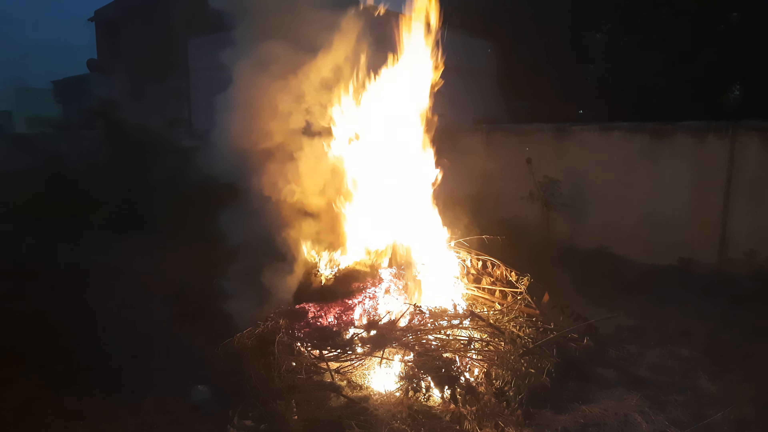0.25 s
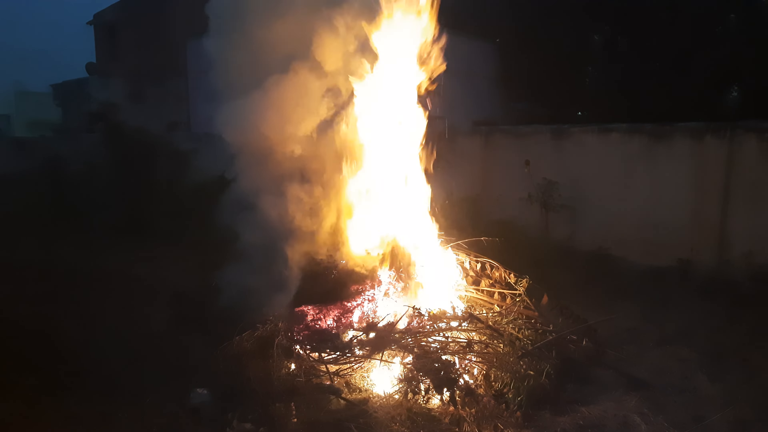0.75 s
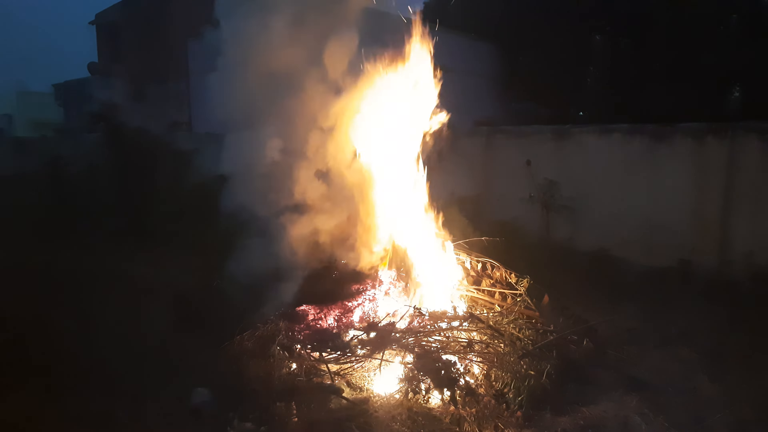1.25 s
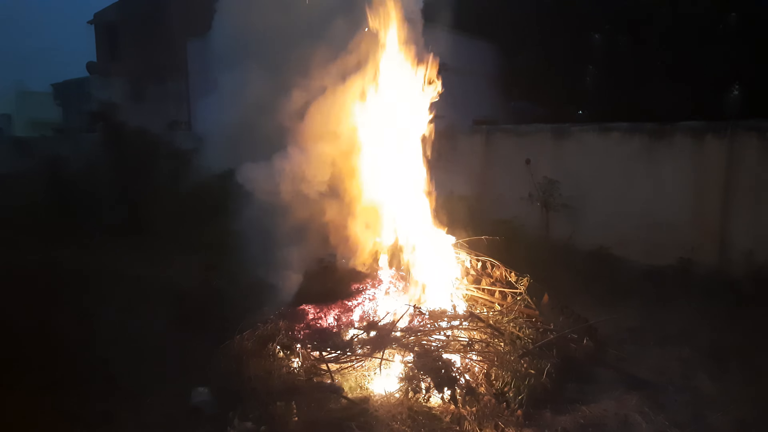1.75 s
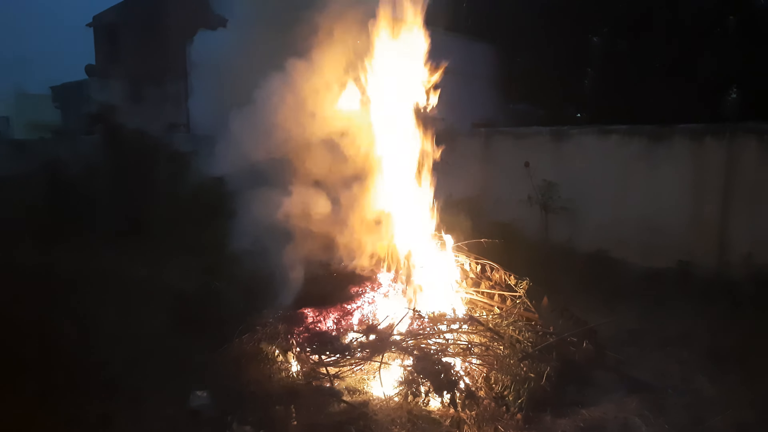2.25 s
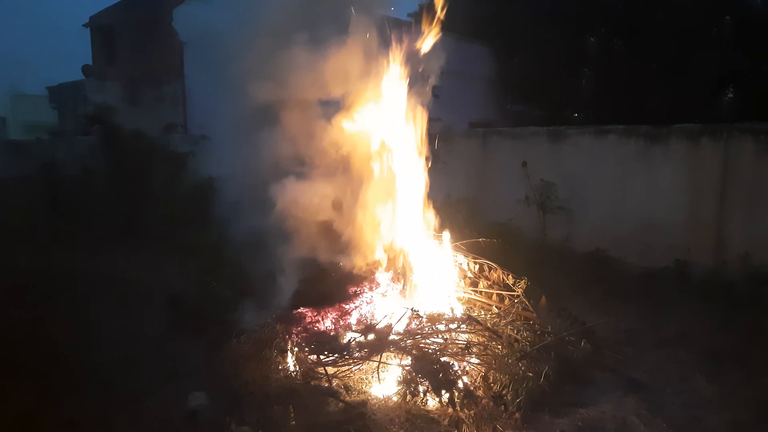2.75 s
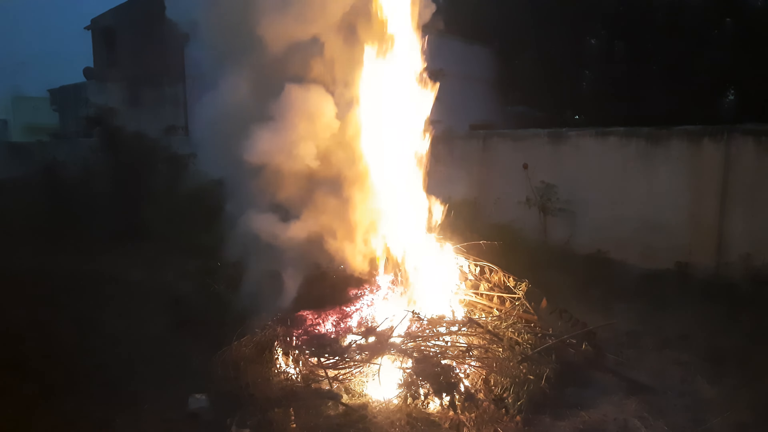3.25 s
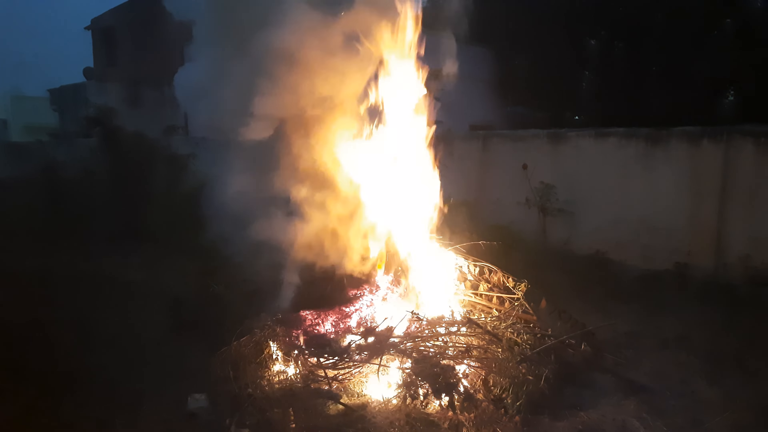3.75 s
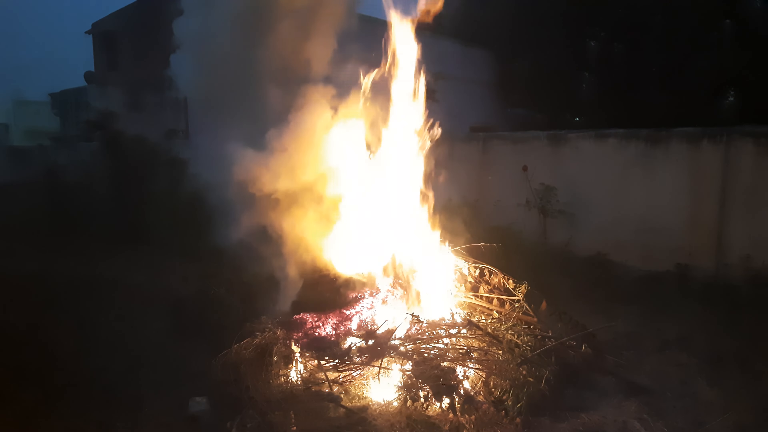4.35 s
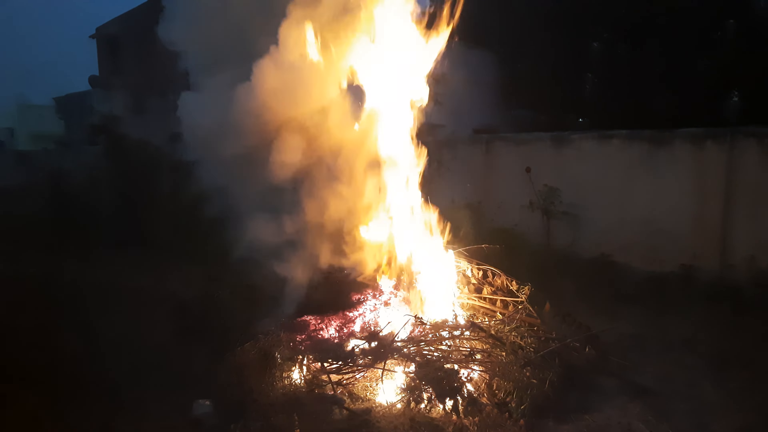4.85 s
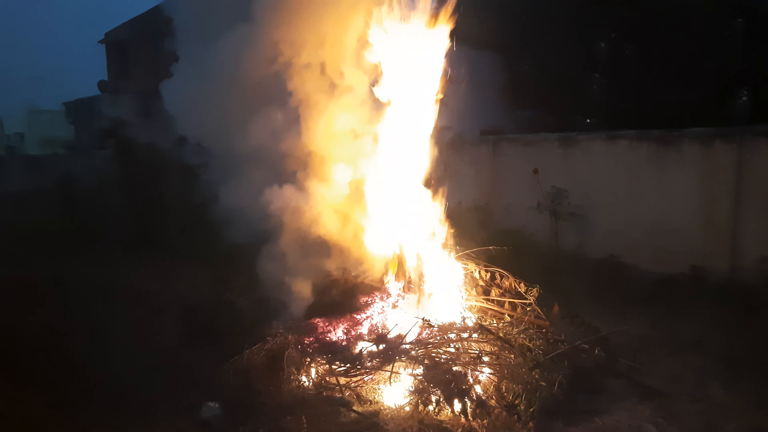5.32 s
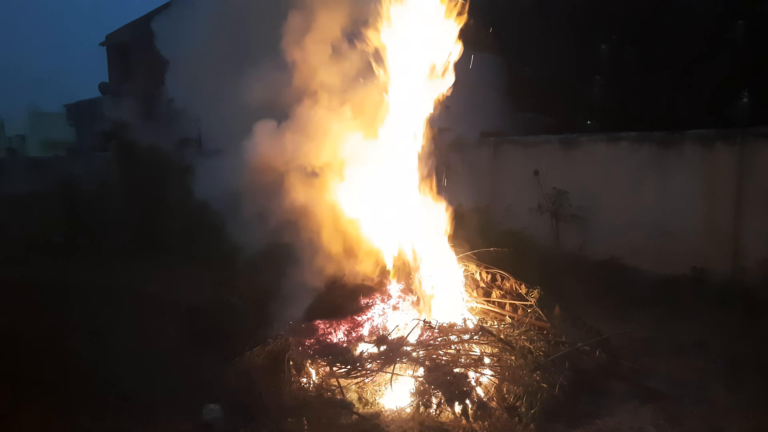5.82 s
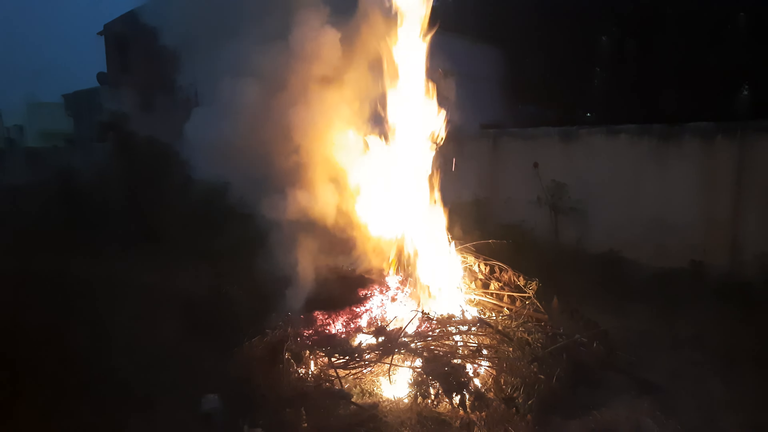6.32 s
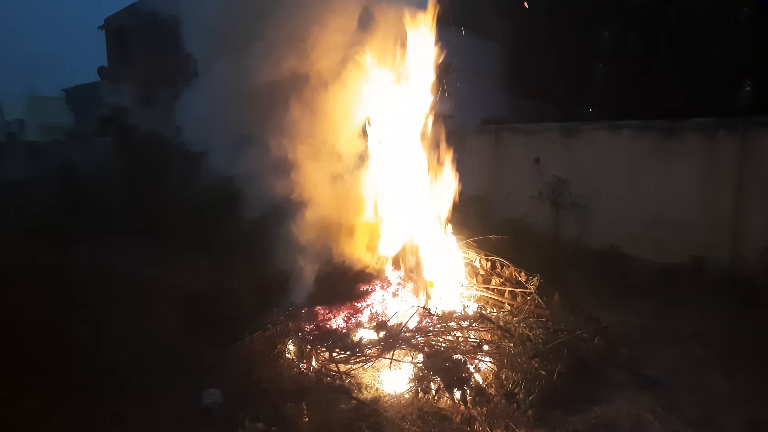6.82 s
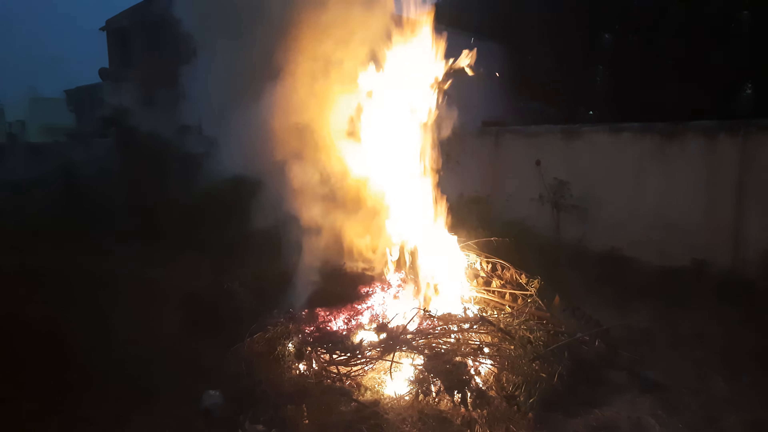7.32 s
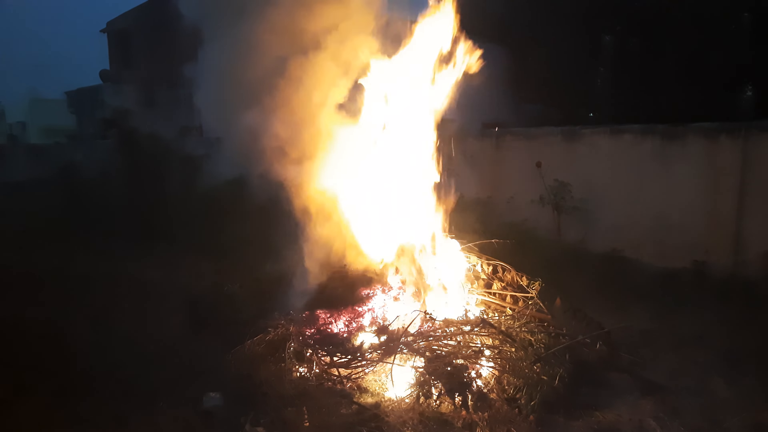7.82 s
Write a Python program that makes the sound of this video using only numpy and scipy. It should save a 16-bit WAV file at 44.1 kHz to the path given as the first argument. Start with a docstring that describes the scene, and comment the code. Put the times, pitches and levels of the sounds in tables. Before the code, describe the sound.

A brush bonfire crackles steadily outdoors, with irregular sharp twig snaps and pops over a faint hiss and low flame roar.

```python
"""A walled yard, a stereo pair of microphones a few metres from a heap of burning dry brush.
The flame flutters with a low roar and hot gas hisses out of the wood. Countless small fibres crackle,
dry tips tick and thicker wood pops. Twigs burst with sharp snaps, each freeing a spurt of gas.
Every crack reaches the microphones directly, then off the ground and the walls."""
import sys
import numpy as np
from scipy import signal
from scipy.fft import rfft, irfft
from scipy.io import wavfile
from scipy.ndimage import uniform_filter1d

SR = 44100
rng = np.random.default_rng(int(sys.argv[2]) if len(sys.argv) > 2 else 0)


def store_pcm(level_fs):
    """Save levels as 16-bit WAV."""
    pcm = np.round(np.clip(level_fs, -1, 1) * 32767).astype(np.int16)
    wavfile.write(sys.argv[1], SR, np.atleast_2d(pcm).T)


N = 355887
BURST_SAMPLES, CUTOFF_HZ = 1024, 16000
SIDES = np.array([[1], [-1]])   # left, right

# The loudest bursting twigs: (time [s], level over 5 ms [dB], tilt [dB/octave], ring pitch [Hz],
# ring [dB], thud [dB], splintering [ms], left minus right [dB])
TWIG_SNAPS = [(0.08, -26.5, 4, 14000.0, 5, 11.0, 0.42, -4), (0.1049, -26, 3.7, 4890.0, 7, 19, 1.1, -3),
              (0.1175, -37.5, 0.3, 2640.0, 6, 15.0, 3.2, 5), (0.129, -34, 3.5, 1430.0, 14, 12, 4.6, -2),
              (0.1835, -19, -2, 6840, 16.5, 2, 0.2, -7), (0.3587, -32.5, 7.1, 6200, 3, 0.0, 0.17, -8),
              (0.373, -33.5, 5.5, 14000.0, -4, 0.0, 0.5, -6), (0.4, -33.5, 4.5, 11750.0, -6, 6, 1.7, -4),
              (0.793, -21.5, 5.5, 6040, -1, 12, 0.9, -4.5), (0.821, -31.5, -2, 7580.0, 13, -10, 0.24, -2),
              (0.8638, -35, 5, 5930.0, 0, 24, 1.5, -1), (0.952, -27.5, -1.5, 5700, 13.5, 8, 0.19, -2),
              (1.039, -25.5, 1.9, 4220, 6.0, -12, 0.8, -2.5),
              (1.0817, -34.5, 5.5, 1310.0, -6, -5.0, 1.8, -3.0), (1.1335, -37, 6, 5820.0, -9, 1.0, 0.9, -5),
              (1.1587, -29, 4, 4890.0, 4, 11, 1.3, -3.5), (1.326, -31.5, 12, 4100.0, 7, 3, 1.5, -2),
              (1.3525, -38.5, 2.5, 1190.0, 6, -3.0, 1.1, -4), (1.3647, -27, -2, 7300, 12.5, 5.5, 0.8, -5),
              (1.3871, -35.9, 1, 3420, 14, 0, 2.9, 0), (1.5025, -19.5, 1.3, 6000, 9.0, 12, 0.83, -8),
              (1.5263, -26.1, -1.4, 3350, 6.0, -13, 3.3, 1.0), (1.7689, -27, 2, 3360, 7, -9, 0.7, -2),
              (1.8221, -29.5, 10, 1310.0, 19, 19.0, 1.2, -5), (1.8403, -18.5, 2.4, 6600, 6, 12.5, 0.19, -2),
              (1.8655, -42, -6, 1200.0, 11, 10, 1.5, 4.0), (1.9795, -24.5, 2.5, 2180, 25, 27, 0.7, 6),
              (2.1106, -36.5, -1.8, 5820.0, 1.0, -14, 1.0, -2),
              (2.1522, -22, 3.5, 6940.0, 3.5, 12.5, 1.6, -4), (2.321, -33.5, 1.8, 4570, 5, 3, 0.4, -2),
              (2.4186, -32.5, 6, 2440, 5, -7.0, 2.4, -3), (2.442, -37.0, 3, 1690, 19, -4.0, 3.7, -1),
              (2.541, -22.5, 1, 4400, 6.5, 7, 1.6, -5), (2.557, -38, 0.9, 4100.0, 5, 6.0, 1.9, -2),
              (2.5694, -19.5, 0.3, 5300, -13, 2.5, 0.6, -3), (2.6485, -16.5, -1, 4830, 4, -3, 1.05, -1),
              (2.7039, -35.7, 2.5, 12820.0, 7, 6.0, 2.4, -3), (2.777, -32, 4.5, 2890.0, 10.0, 22, 1, -3.0),
              (2.8115, -30.5, 0, 5940, 3.5, -1, 0.64, -1.0), (2.863, -31.5, -2.9, 1720, -1, -35, 1.6, 4),
              (2.9029, -30, 0.5, 3060, 17.0, -8.0, 0.7, 1), (2.9234, -36, 7, 8270.0, 6.0, -12, 0.98, -6),
              (2.9844, -29.5, -3, 7900.0, 13, 9, 2.5, -9.0), (2.9897, -17.5, 1, 8900, 14, 5.5, 1.2, -6.5),
              (3.0022, -35.5, -3.5, 6940.0, 2, 16, 2.8, 6), (3.027, -25.5, -6.5, 1220, 7, -9, 1.4, 7.5),
              (3.1298, -36, 5, 6360.0, 4.0, 1.0, 0.67, -4.0), (3.1573, -32.5, 5, 6940.0, 2, -4, 4.8, -4),
              (3.3736, -37.5, 3.5, 1110, 8, 0.0, 1, -2), (3.4878, -40, 4, 5820.0, 6, -6, 1.6, -7.0),
              (3.6257, -37.5, -3.5, 12490.0, 7, 6, 3.8, 3), (3.6692, -31.5, 2.0, 6860, 4.0, 7, 2.3, -3),
              (3.6883, -32, 0.8, 12820.0, 12, 8, 0.3, -5.0),
              (3.7962, -40.5, -0.5, 1780.0, 4.0, -8, 1.1, -1), (4.0415, -36, 0, 4890.0, 20, 23, 0.46, -1),
              (4.0913, -36.5, -2, 1740, 8.0, -1, 0.78, 5), (4.1089, -33.5, 3.5, 14000.0, 1.0, 3, 0.9, -6),
              (4.1477, -33, 1.5, 2420.0, 5, 15.5, 1.1, -2.0), (4.1717, -36, -2.5, 2140, 17, 13, 2.6, 4),
              (4.2887, -35, -1, 2120.0, 1.0, -1, 2.5, 3.0), (4.301, -29.5, 4.5, 5820.0, -20, 20, 0.8, -6.0),
              (4.3152, -36, 0.5, 1590, 9, -5, 2.8, 0), (4.3544, -28.5, 1.7, 2220.0, 10, 16, 1.3, 0),
              (4.3783, -32, -2, 2470, 23, -1.0, 2.3, 3), (4.4146, -37.5, 0.5, 13220.0, 9.0, -9, 1.2, -4.0),
              (4.4498, -34.5, -4.5, 4480.0, 7, 2, 3, 2), (4.4806, -31.5, -6.5, 5270, 17, -4, 1.2, 1),
              (4.5037, -26.5, -3.5, 7500, 18, -19, 1.3, -2), (4.5285, -32, -2.6, 7000, 16.0, -8, 1.3, -3),
              (4.555, -16.5, 0.3, 7450, 4.5, 0.5, 1.2, -6), (4.582, -31.5, 2, 4480.0, 10, -11.0, 3.1, 4),
              (4.6203, -20.5, -3, 2660, 1.5, -6.5, 1.1, 1.0), (4.6483, -41, -7, 1430.0, 10, 9, 2.7, 7),
              (4.7464, -30, 1.5, 5820.0, 5, 12.0, 1.2, -6.0), (4.7833, -17, 4.5, 5330.0, -5, 19.5, 1.4, -8),
              (4.8552, -24, 4, 2200, 3.5, 7, 0.5, -4), (5.0269, -23, 1.9, 6840, 0, 5, 0.6, -3.0),
              (5.2799, -27.5, 0.2, 2890.0, 5.0, 14, 0.73, -2.0), (5.2941, -29, 0.5, 4400, 4, 9, 1.3, -3),
              (5.3188, -34.8, 0, 3440.0, 4.0, -17.0, 3.5, 5.5),
              (5.332, -22.7, 2.4, 5430, -10, 6, 0.67, -8.5), (5.5039, -34, 7.1, 10760.0, 10, 0.0, 0.4, -11),
              (5.5274, -31, 5, 6800, 19, 20, 1.3, -4), (5.6475, -25.5, -1, 3200, 7, 6, 1.3, -4.5),
              (5.922, -21.5, 0.1, 5330.0, 6, 3.5, 0.77, -5.5), (5.946, -31, 0.5, 1550, 4, -1, 2.8, -1.0),
              (5.961, -38, 4, 1430.0, 4.0, 8, 1.5, -1), (6.0818, -23, 1.9, 10400, 20.0, 14, 0.28, -5.5),
              (6.1647, -32.3, -1.3, 4670, 4.5, 11, 1.1, -8.5), (6.3277, -31, -0.4, 2620, 13, 1, 0.88, -1),
              (6.3823, -15.5, -1.4, 8900, 12, 4, 2.5, -6.0), (6.4108, -35, -1, 1690, 4.0, -8.0, 2.3, 3),
              (6.4344, -33.4, 4, 8270.0, -3, -8.0, 2.1, -2.0),
              (6.4991, -36.5, -1, 1500.0, 12, 18.5, 2.3, 2), (6.5792, -32.5, -1, 10200, 10, -8.0, 2, -4),
              (6.7868, -26, -1.5, 1630, 5, -1, 1.4, -2), (6.8473, -34.5, -0.5, 6940.0, 24, -2.0, 1.2, -4.0),
              (6.9246, -36, -1.5, 3380, 5.0, -18, 1.1, 1), (6.9866, -35.5, 7, 1710.0, 12, 0.0, 0.4, -6),
              (7.0498, -31, -1.5, 2640.0, 13, -3, 0.71, 3.5), (7.1677, -35.5, 2.8, 5820.0, 7, 19, 0.52, -3),
              (7.2365, -30.5, -2.7, 3370, 14, 9.5, 1.5, 2), (7.2779, -33.7, 2, 2430, 6, -9.0, 0.58, -2),
              (7.3758, -23.5, -1, 7500, 11.0, 1.0, 1.7, -4.5), (7.4, -28, 0, 1560.0, 2, -16, 2, 1),
              (7.4516, -24, -4, 1630, 7.5, -2.5, 1.35, 6), (7.4946, -24.0, 1, 7040, 7.5, 2, 0.71, -5.0),
              (7.5194, -34.5, 2, 7460, 20, -1.0, 1.8, -1.0), (7.5441, -33, -2.7, 5330.0, 2.0, 4.0, 1.9, 1),
              (7.583, -20.5, 0.4, 8600, 7.5, 3, 0.83, -8.5), (7.608, -35, 3, 1420, 2, -4.0, 2.1, 2),
              (7.62, -41, 3.5, 4480.0, 9, 14, 0.7, -3.0), (7.6505, -29.5, 3.5, 5250, 7, -1, 0.33, -8),
              (7.6747, -31.5, 2.3, 9030.0, 6, 19, 1.4, -6), (7.6895, -31.5, 1.5, 7580.0, 0, -12, 0.36, -1),
              (7.7134, -31.5, 0, 7580.0, -9, 4, 5, 1), (7.7487, -35.5, 0.5, 3100, 5, 15, 0.78, -1),
              (7.896, -36, 9, 14200, 2, 15, 5.2, -3), (8.0553, -28.5, -2.2, 4200, 10, 1, 0.32, -5)]


def from_db(db):
    """Decibels as an amplitude ratio."""
    return 10 ** (np.asarray(db) / 20)


def unit_rms(x):
    """The signal scaled to an rms of 1."""
    return x / np.sqrt(np.mean(x ** 2) + 1e-20)


def bin_hz(size=N):
    """Frequencies of the bins of a transform."""
    return np.arange(size // 2 + 1) * SR / size


def in_time(curve):
    """A (time, value) curve at every sample."""
    return np.interp(np.arange(N) / SR, *np.transpose(curve))


def at_hz(points, hz):
    """Each column of a spectrum, joined on a log-frequency axis."""
    known_hz, *columns = np.transpose(points)
    return np.array([np.interp(np.log(hz + 1), np.log(known_hz), column) for column in columns])


def drift(rate_hz):
    """A random wander of rms 1, with `rate_hz` new values a second."""
    knots = rng.standard_normal(4096)
    return unit_rms(np.interp(np.arange(N) / SR * rate_hz, np.arange(len(knots)), knots))


def stereo_noise(spectrum, alike):
    """Coloured noise of rms 1, partly shared by the two microphones."""
    mid, side = rng.standard_normal((2, N))
    white = np.sqrt(1 + alike) * mid + np.sqrt(1 - alike) * side * SIDES
    return unit_rms(irfft(rfft(white) * from_db(at_hz(spectrum, bin_hz())), N))


def minimum_phase(gain):
    """A response with this gain in which nothing sounds before the crack."""
    cepstrum = irfft(np.log(gain + 1e-6))
    cepstrum[..., 1:BURST_SAMPLES // 2] *= 2
    cepstrum[..., BURST_SAMPLES // 2 + 1:] = 0
    return np.exp(rfft(cepstrum))


def flame(gain_db=2.5, flutter_db=2.5):
    """The column of flame makes a low, fluttering roar, nearly the same at both microphones."""
    # Spectrum of the turbulence: (frequency [Hz], relative level [dB])
    roar_spectrum = [(20, -36), (30, -30), (38, -13), (52, -0.5), (64, -6), (80, 2.5), (98, -4), (120, 3),
                     (180, -5), (270, -3.5), (400, -11.5), (560, -27), (1000, -24), (6000, -65)]
    # Rise and fall of the blaze: (time [s], level before gain [dB])
    blaze = [(0.0, -56), (0.76, -59), (0.99, -55), (1.3, -59), (1.75, -56.5), (2.88, -59.5), (4.09, -60),
             (4.49, -55.5), (5.15, -60), (5.53, -55), (5.77, -59.5), (6.56, -56), (6.99, -59),
             (7.57, -54.5), (7.84, -56.5), (8.07, -57.5)]
    turbulence = stereo_noise(roar_spectrum, alike=0.84)
    return turbulence * from_db(in_time(blaze) + gain_db + flutter_db * drift(rate_hz=25))


def fizz_level(gain_db=-6.5, waver_db=1.38):
    """Level of the fizz in dB: it follows the fire's vigour and wavers as flame licks over the brush."""
    # How hard the brush burns: (time [s], level before gain [dB])
    vigour = [(0.0, -50.4), (0.12, -49), (0.96, -54), (1.08, -44), (1.32, -54.5), (1.44, -53), (2.28, -49),
              (2.88, -49), (3.36, -52), (3.72, -50), (3.84, -58.5), (4.08, -49), (4.8, -54), (4.92, -59),
              (5.16, -46.5), (5.28, -58.5), (5.64, -45.5), (6.0, -54.5), (6.12, -45), (6.24, -51.5),
              (6.48, -49.5), (6.72, -49), (7.44, -52), (7.68, -47), (7.8, -55), (8.07, -47)]
    return in_time(vigour) + gain_db + waver_db * drift(rate_hz=12)


def gas_flow(fizz_db, spurt_db=-26.5, rise_s=0.0061, fall_s=0.059):
    """Flow of gas in dB: the fizz plus a dying spurt freed by each twig snap."""
    power = from_db(fizz_db) ** 2
    t = np.arange(SR // 2) / SR
    spurt = (1 - np.exp(-t / rise_s)) * np.exp(-t / fall_s)
    for time_s, snap_db, *_ in TWIG_SNAPS:
        start = int(time_s * SR)
        power[start:start + len(t)] += (from_db(snap_db + spurt_db) * spurt[:N - start]) ** 2
    return 10 * np.log10(power)


def hiss(flow_db, gain_db=-1.0, flicker_db=2.5):
    """Gas jets out of the heated wood with a flickering hiss."""
    # Spectrum of the escaping gas: (frequency [Hz], relative level [dB])
    jet_spectrum = [(250, -20), (560, -9.5), (850, 2), (1350, -10), (1750, -1), (2150, 0), (2700, -4.5),
                    (3400, -5), (4700, 1.5), (6100, -3.5), (7600, 0.5), (9700, -15.5), (12300, -3),
                    (15500, -13)]
    # Its balance between the microphones: (frequency [Hz], left minus right [dB])
    balance = [(600, 6.5), (1300, -2), (2300, 2), (4400, 4.5), (8000, -3), (15000, -10)]
    jets = stereo_noise(jet_spectrum, alike=0.55)
    panned = irfft(rfft(jets) * from_db(at_hz(balance, bin_hz()) * SIDES / 2), N)
    return panned * from_db(flow_db + gain_db + flicker_db * drift(rate_hz=60))


def bursts(rows, splinter_db=7.0, splinter_hz=900, alike=0.45, ring_q=3.17, thud_hz=520, shade_hz=800,
           ground_s=0.0008895, ground_share=0.82, ground_dull_hz=6840, left_lead_s=0.00003):
    """Wood bursts with one pressure pulse and a spray of splinters; columns as in TWIG_SNAPS."""
    # Colour of a crack at the two microphones: (frequency [Hz], left [dB], right [dB])
    mic_colour = [(99, -19.5, -18.5), (253, -9, -8), (470, -9.5, -8.5), (880, -10, -3), (1410, -3.5, -16),
                  (2200, -1.5, -11), (3080, -16, -2), (3180, -21.5, -8.5), (4800, -5, 1), (6170, -12.5, -2),
                  (7880, -5, 0), (9800, -19, -14), (12230, -13.5, -4.5), (15500, -17.5, -11.5)]
    time_s, level_db, tilt, ring_hz, ring_db, thud_db, splinter_ms, pan_db = rows.T[:, :, None, None]
    hz, ms = bin_hz(BURST_SAMPLES), np.arange(BURST_SAMPLES) / SR * 1000
    chance = rng.standard_normal((len(rows), 4, BURST_SAMPLES))

    # splinters die away within milliseconds and reach each microphone a little differently
    splinter_ms = np.maximum(splinter_ms, 0.2)
    spray = np.sqrt(alike) * chance[:, :1] + np.sqrt(1 - alike) * chance[:, 1:3]
    spray *= np.exp(-ms / splinter_ms)
    spray /= np.sqrt(np.sum(spray ** 2, axis=-1, keepdims=True))
    spray *= from_db(splinter_db) * splinter_ms   # long splintering outweighs the first pulse
    crack = 1 + rfft(spray) * (1j * hz / (splinter_hz + 1j * hz)) ** 2
    whitening = uniform_filter1d(np.abs(crack) ** 2, size=25, axis=-1) ** -0.5

    # the colour comes from the twig: thick wood pops, thin wood ticks, each rings at its own pitch
    octaves = np.log2(np.maximum(hz, 500) / 4000)
    detuning = ring_q * (hz / ring_hz - ring_hz / (hz + 1))
    ring = np.sqrt(1 + from_db(ring_db) ** 2 / (1 + detuning ** 2))
    bass_db = thud_db / (1 + (hz / thud_hz) ** 6)   # each crack has more or less low thud
    colour = from_db(tilt * octaves + bass_db + at_hz(mic_colour, hz))
    band_ends = (hz + 5) / (hz + 60) / np.sqrt(1 + (hz / CUTOFF_HZ) ** 20)

    # height in the heap sets the delay of the ground bounce, bearing the lag between the microphones
    height, bearing = chance[:, 3:, :1], chance[:, 3:, 1:2]
    bounce = np.exp(-2j * np.pi * hz * ground_s * np.exp(0.1 * height))
    ground = 1 + ground_share * np.exp(-hz / ground_dull_hz) * bounce
    arrival = np.exp(1j * np.pi * hz * SIDES * left_lead_s * (1 + 0.79 * bearing))
    spectra = crack * ground * minimum_phase(whitening * ring * band_ends * colour)

    # the microphone housing shades one side, but only in the treble
    side_db = 10 * np.log10(np.sum(np.abs(spectra) ** 2, axis=-1, keepdims=True))
    shade_db = (pan_db - side_db[:, :1] + side_db[:, 1:]) * hz ** 2 / (hz ** 2 + shade_hz ** 2)
    waves = irfft(spectra * arrival * from_db(shade_db * SIDES / 2))
    waves = np.roll(waves, 8, axis=-1)   # room for the side that arrives first
    rms_over_5ms = np.sqrt(np.sum(waves ** 2, axis=(1, 2), keepdims=True) / (2 * 0.005 * SR))
    waves *= from_db(level_db) / rms_over_5ms

    track = np.zeros((2, N + BURST_SAMPLES))
    starts = np.clip(time_s.ravel() * SR, 0, N - 1).astype(int)
    for start, wave in zip(starts, waves):
        track[:, start:start + BURST_SAMPLES] += wave
    return track[:, :N]


def crackle(fizz_db, per_s, above_db, spread_db, largest_db, mean_tilt, tilt_spread,
            low_hz, high_hz, ring_db, thud_db, splinter_ms, count):
    """Small bursts come at random, most of them faint, louder where the brush fizzes hardest."""
    even, normal = rng.random((count, 3)), rng.standard_normal((count, 3))
    time_s = np.cumsum(-np.log(1 - even[:, 0])) / per_s
    floor_db = np.interp(time_s * SR, np.arange(N), fizz_db) + above_db
    level_db = np.minimum(floor_db - spread_db * np.log(1 - even[:, 1]), largest_db)
    tilt = mean_tilt + tilt_spread * normal[:, 0]
    ring_hz = low_hz * (high_hz / low_hz) ** np.sqrt(even[:, 2])
    decay_ms = splinter_ms * np.exp(1.25 * normal[:, 1])
    pan_db = -1.5 - 1.3 * tilt + normal[:, 2]   # the left microphone favours pops, the right one ticks
    rows = np.column_stack([time_s, level_db, tilt, ring_hz, np.full(count, ring_db),
                            np.full(count, thud_db), decay_ms, pan_db])
    return bursts(rows[time_s < N / SR])


def fibres(fizz_db):
    """Countless thin fibres burst in a fine, bright crackle."""
    return crackle(fizz_db, per_s=140, above_db=0.5, spread_db=4.0, largest_db=-39.5,
                   mean_tilt=1.8, tilt_spread=3.7, low_hz=1630, high_hz=14700,
                   ring_db=14.0, thud_db=-4.5, splinter_ms=1.0, count=1600)


def needles(fizz_db, follows=0.48):
    """The finest dry tips burst with thin, glassy ticks that carry on through the lulls."""
    evened_db = fizz_db.mean() + follows * (fizz_db - fizz_db.mean())
    return crackle(evened_db, per_s=30, above_db=7.5, spread_db=2.0, largest_db=-31,
                   mean_tilt=4.5, tilt_spread=1.6, low_hz=7700, high_hz=14500,
                   ring_db=7.5, thud_db=3.0, splinter_ms=1.0, count=400)


def snaps(spread_db=4.0):
    """Twigs burst sharply; a very faint tick leads into each snap, and a light crack follows."""
    # The tick before and the crack after: (typical offset [s], level relative to the snap [dB])
    side_cracks = [(-.004, -27), (.008, -18.5)]
    twigs = np.array(TWIG_SNAPS)
    chance = rng.standard_normal((len(twigs), len(side_cracks), 2))
    cracks = [twigs]
    for k, (offset_s, relative_db) in enumerate(side_cracks):
        time_s = twigs[:, 0] + offset_s * np.exp(chance[:, k, 0] / 2)
        level_db = twigs[:, 1] + relative_db + spread_db * chance[:, k, 1]
        cracks.append(np.column_stack([time_s, level_db, twigs[:, 2:]]))
    return bursts(np.vstack(cracks))


def embers(fizz_db):
    """Thicker wood deep in the heap gives small, dull pops."""
    return crackle(fizz_db, per_s=12, above_db=5.0, spread_db=4.0, largest_db=-40,
                   mean_tilt=-1.6, tilt_spread=0.83, low_hz=1200, high_hz=2370,
                   ring_db=7.5, thud_db=7.5, splinter_ms=1.2, count=160)


def yard_echoes(wood, tail_db=-15.5, t60_s=0.36, build_s=0.00022, scatter_s=0.002,
                band_hz=(500, 9000), spots=3):
    """Rough walls return a few smeared echoes and a faint diffuse tail."""
    # Echoes off the walls: (delay [s], level before the band filter [dB])
    walls = [(.0098, -25.5), (0.0174, -28), (0.024, -17.5)]
    t = np.arange(SR) / SR
    power = from_db(-120 * t / t60_s) * (1 - np.exp(-t / build_s)) ** 2
    power *= from_db(tail_db) ** 2 / power.sum()
    for delay_s, echo_db in walls:
        echo = (t >= delay_s) * np.exp(-np.abs(t - delay_s) / scatter_s)
        power += from_db(echo_db) ** 2 * echo / echo.sum()
    band = signal.butter(1, band_hz, "band", fs=SR, output="sos")
    responses = signal.sosfilt(band, np.sqrt(power) * rng.standard_normal((spots, 2, SR)))
    # the bursts wander over the heap, and every spot has its own pattern of reflections
    spot = rng.integers(0, spots, N // BURST_SAMPLES + 1)[np.arange(N) // BURST_SAMPLES]
    return sum(signal.fftconvolve(wood * (spot == k), response, axes=1)[:, :N]
               for k, response in enumerate(responses))


def scene():
    """The fire from a few metres: snaps and crackle with their echoes, over hiss and flame."""
    fizz_db = fizz_level()
    wood = snaps() + fibres(fizz_db) + needles(fizz_db) + embers(fizz_db)
    return wood + yard_echoes(wood) + hiss(gas_flow(fizz_db)) + flame()


def record(dry, ceiling=3.0):
    """The tallest peaks are rounded and the top octave ends steeply."""
    rounded = ceiling * np.tanh(dry / ceiling)
    lowpass = signal.ellip(10, 0.1, 70, CUTOFF_HZ, fs=SR, output="sos")
    return signal.sosfilt(lowpass, rounded)


dry = scene()
out = record(dry)
store_pcm(out)
```